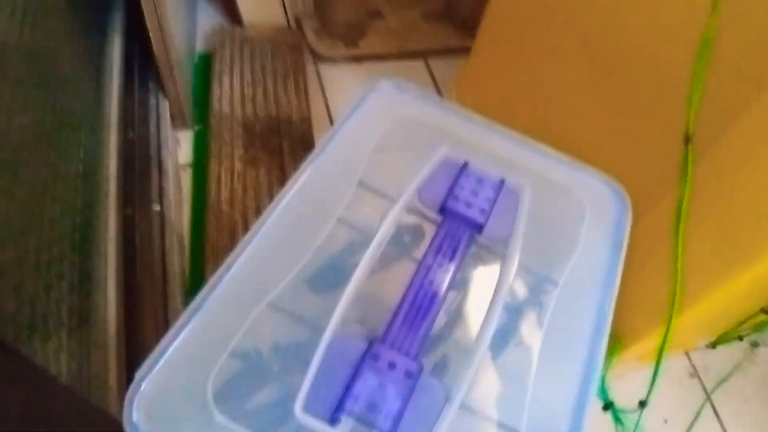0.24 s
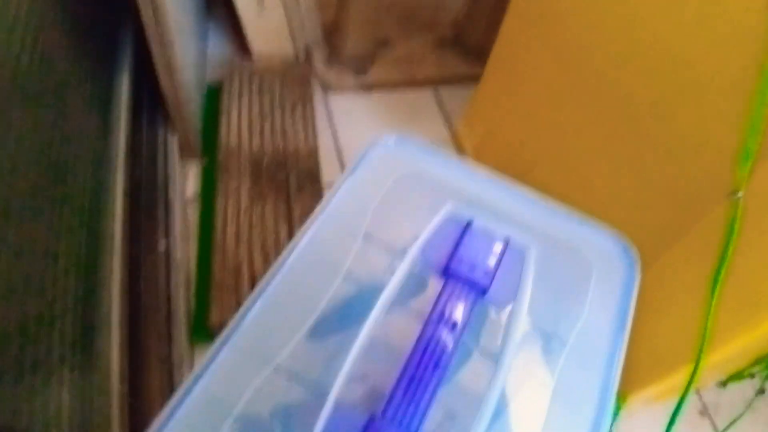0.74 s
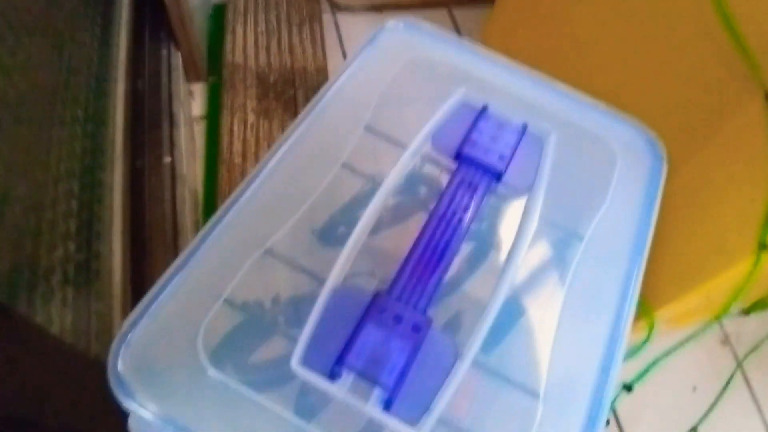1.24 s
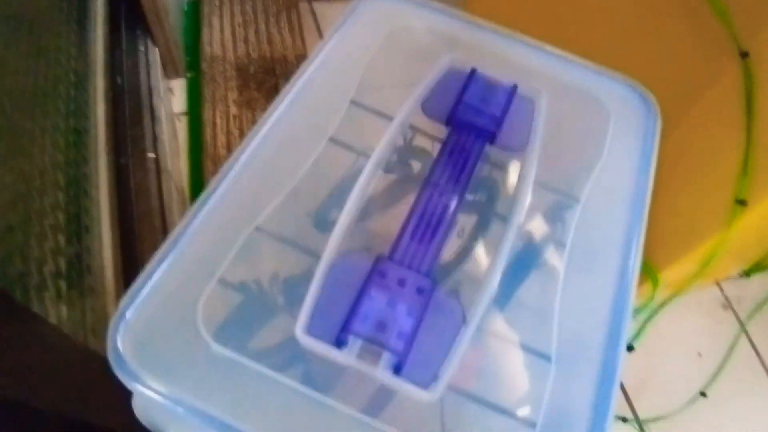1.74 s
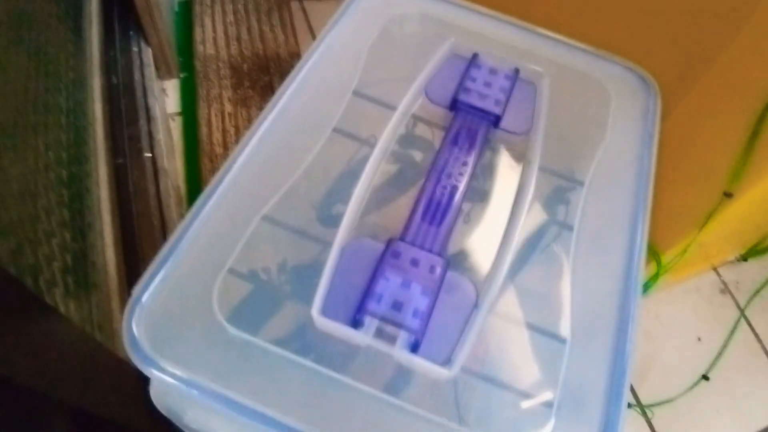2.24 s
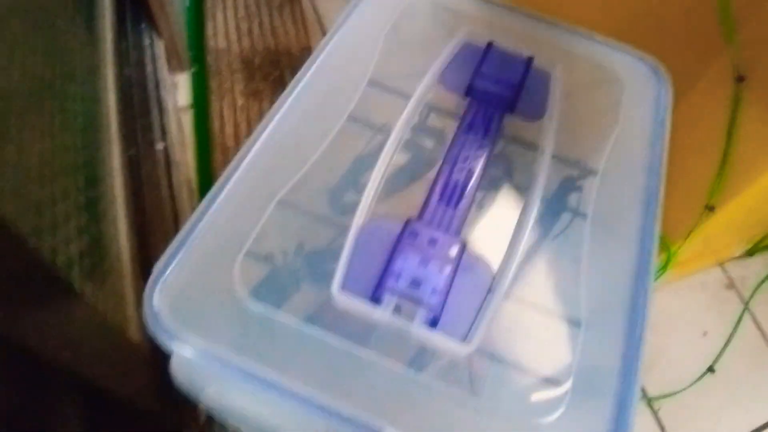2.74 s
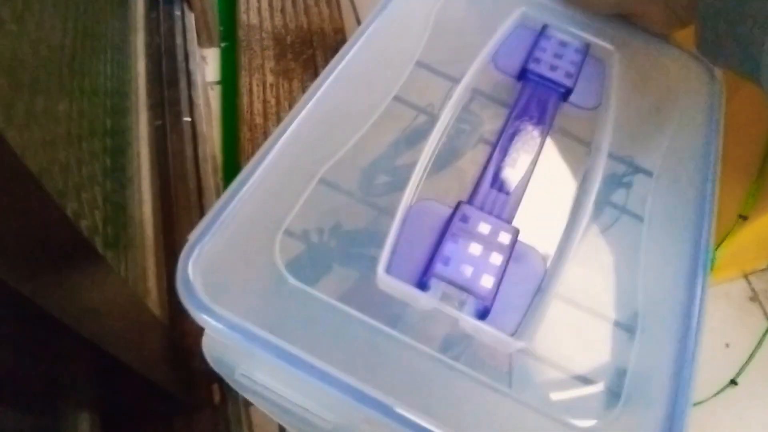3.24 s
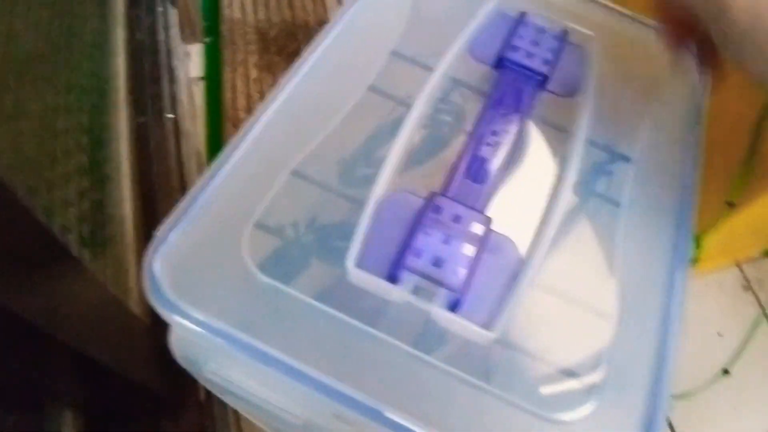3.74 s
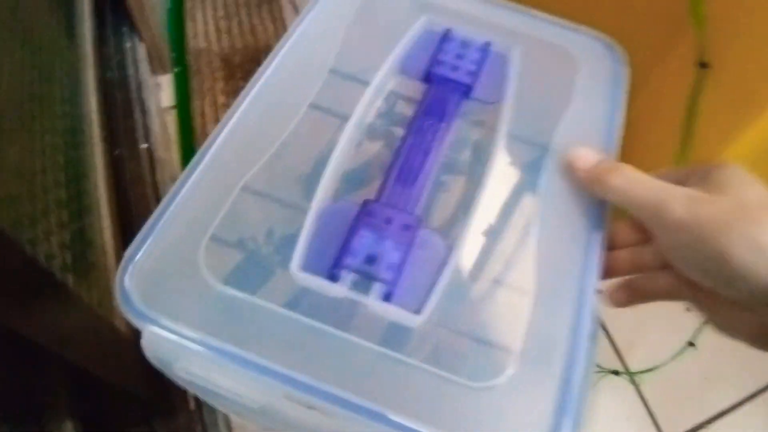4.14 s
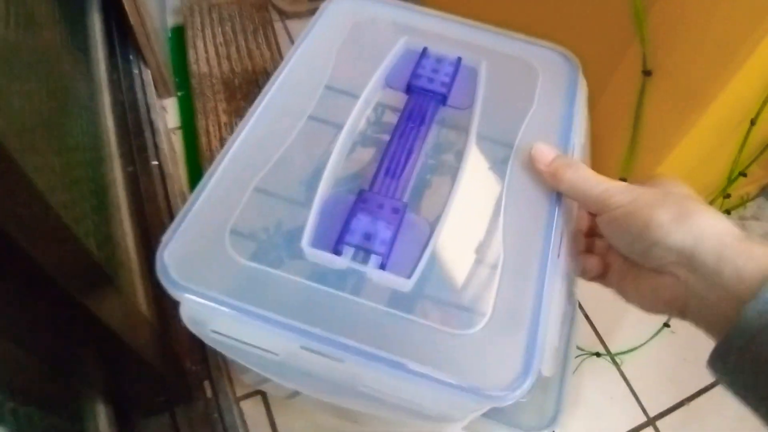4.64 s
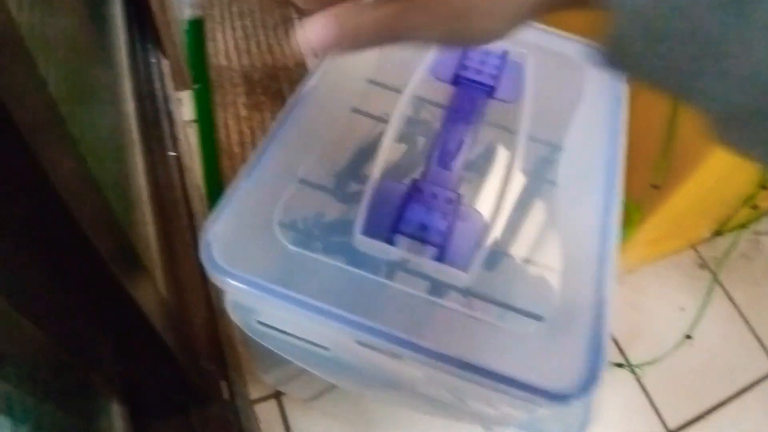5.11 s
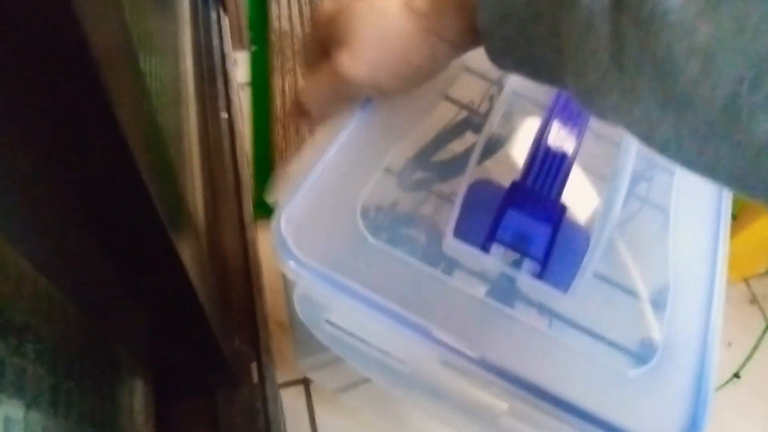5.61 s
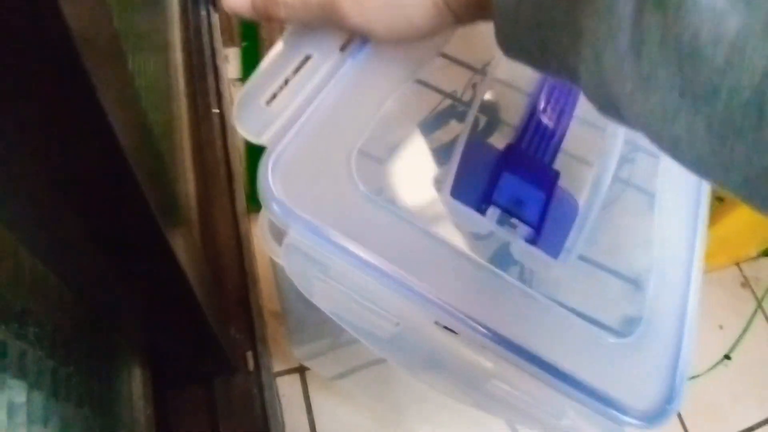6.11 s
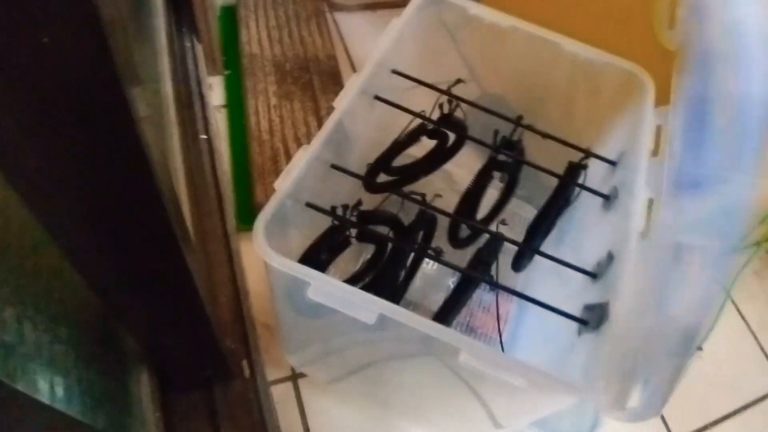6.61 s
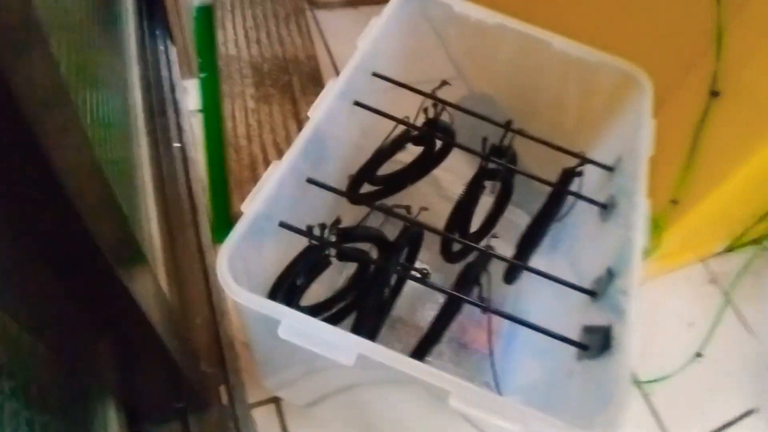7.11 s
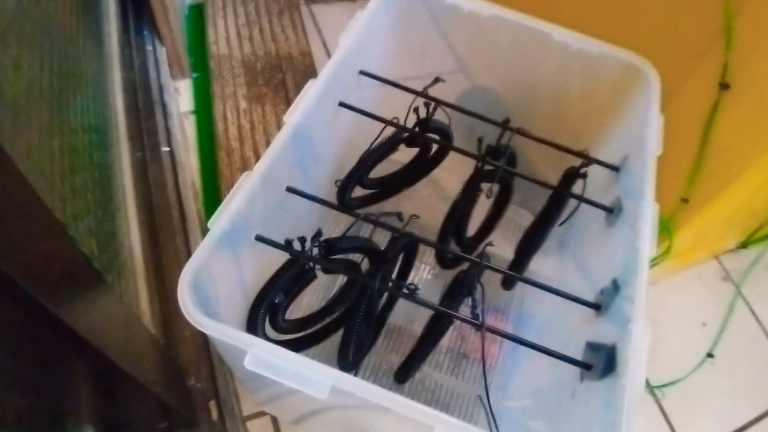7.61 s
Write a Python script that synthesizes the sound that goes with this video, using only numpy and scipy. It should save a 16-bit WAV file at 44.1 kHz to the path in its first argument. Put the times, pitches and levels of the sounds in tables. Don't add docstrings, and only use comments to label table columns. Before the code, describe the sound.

Close up in a small tiled room, a hollow plastic box is dragged in gritty scrapes with boomy bumps. After a quieter pause, fingers tap and rub the lid; a light latch click, then a hard snap, then the loudest crack. The lid comes free with soft pops and is put down with a brittle rattle. A faint machine drones far off.

```python
import sys
import numpy as np
from scipy import signal
from scipy.fft import rfft, irfft, next_fast_len
from scipy.io import wavfile
from scipy.ndimage import uniform_filter1d, map_coordinates

SR = 44100
rng = np.random.default_rng(int(sys.argv[2]) if len(sys.argv) > 2 else 0)


def boost_factor(decibels):
    exponent = np.asarray(decibels, float) / 20
    return 10 ** exponent


def digitize_waveform(pressure):
    field = np.atleast_2d(pressure).T
    bounded = np.clip(field, -1, 1)
    quanta = np.round(bounded * 32767).astype(np.int16)
    wavfile.write(sys.argv[1], SR, quanta)


N = 346626

# centre in Hz, width in Hz, level in dB.
HOLLOW_MODES = [(144.6, 9.5, 2.5), (207, 29, 2), (261.5, 20, 0), (312, 28, -7)]
SHELL_MODES = [(430, 40, 2), (599, 250, -3), (806, 82, -1.5), (1042, 313, -0.5), (1188, 405, -1),
               (1550, 206, -3.5), (2230, 920, -10)]
LID_MODES = [(145, 24, -1), (180, 15, -2), (213.7, 13, 0), (272, 8.5, 4), (353, 81, -4)]
# frequency in Hz, density in dB per Hz.
CRACK_SPECTRUM = [(1800, -73), (2600, 0.5), (4500, -2), (7000, -6.5), (10000, -9.5), (15000, -5.5)]


def rms(x):
    return np.sqrt(np.mean(np.abs(x) ** 2))


def unit(x):
    return x / np.sqrt(np.mean(x ** 2) + 1e-20)


def along(points, hz):
    f, v = np.transpose(points)
    return np.interp(np.log(hz + 1), np.log(f + 1), v)


def wobble(knots_per_s):
    knots = rng.standard_normal(int(N * knots_per_s / SR) + 4)
    return map_coordinates(knots, [np.arange(N) * knots_per_s / SR])


def filtered(x, response):
    size = next_fast_len(N + SR // 2)
    gain = response(np.fft.rfftfreq(size, 1 / SR))
    first = gain[0] if gain.ndim > 1 else gain
    return irfft(rfft(x, size) * gain / rms(first), size)[..., :N]


def modes(table):
    def response(f):
        total = 0
        for k, (centre_hz, width_hz, db) in enumerate(table):
            damping = 1j * f * width_hz
            total = total + (-1) ** k * boost_factor(db) * damping / (centre_hz ** 2 - f * f + damping)
        return total
    return response


def spectrum(points):
    return lambda f: boost_factor(along(points, f))


def stereo(pair):
    # frequency in Hz, correlation 0..1.
    likeness = [(100, 0.79), (250, 0.83), (500, 0.5), (1000, 0.12), (3000, 0.11), (8000, 0.19)]

    def mid_side(f):
        angle = np.arccos(np.clip(along(likeness, f), 0, .999)) / 2
        return np.array([np.cos(angle), np.sin(angle)])

    mid, side = filtered(pair, mid_side)
    return np.array([mid + side, mid - side])


def background():
    # time in s, room tone in dB, drone in dB.
    levels = [(0, -54.5, -57.5), (1.3, -64.5, -58.5), (2.5, -63, -58), (3.6, -62.5, -58.5),
              (4.2, -56.5, -57.5), (5, -59.5, -58), (6, -55, -57), (6.7, -55, -56.5), (7.2, -57.5, -57.5),
              (7.86, -66, -56)]
    # frequency in Hz, density in dB per Hz.
    air_spectrum = [(12, -35.5), (20, -13.5), (54, -2.5), (98, -12), (144, -4.5), (325, -15.5),
                    (401, -11.5), (474, -15), (818, -15), (1190, -24), (3000, -50.5), (3900, -90),
                    (6600, -120)]
    # centre in Hz, width in Hz, level in dB.
    drone_modes = [(33, 5.5, -9), (60.1, 6, 3.5), (128, 1.5, -0.5), (165, 16, -8.5), (430, 12, -19),
                   (665, 8.9, -25)]
    # frequency in Hz, density in dB per Hz.
    hiss_spectrum = [(1000, -12), (2000, 0), (4000, -1), (7000, -2), (9000, -5), (16000, -6)]
    t = np.arange(N) / SR
    s, air_db, drone_db = np.transpose(levels)
    air_gain = boost_factor(np.interp(t, s, air_db) + wobble(3))
    drone_gain = boost_factor(np.interp(t, s, drone_db))
    air = unit(stereo(filtered(rng.standard_normal((2, N)), spectrum(air_spectrum))))
    drone = unit(filtered(rng.standard_normal(N), modes(drone_modes)))
    hiss = filtered(rng.standard_normal((2, N)), spectrum(hiss_spectrum))
    return boost_factor(-1.0) * air_gain * air + drone_gain * drone + boost_factor(-76.5) * hiss


def strokes(rows, brightens=0):
    hold = 1.76
    edge_db = 25
    t = np.arange(0, N / SR, .001)
    gain = 0
    for s, db, rise_s, fall_s, *speed_db in rows:
        distance = np.maximum((s - t) / max(rise_s, .005), (t - s) / max(fall_s, .005))
        gain = gain + boost_factor(db + brightens * sum(speed_db) - edge_db * distance ** hold)
    return np.interp(np.arange(N) / SR, t, gain)


def driven(force, table):
    x = unit(filtered(force, lambda f: modes(table)(f) / (1 + (f / 450) ** 4)))
    power = np.abs(uniform_filter1d(x * x, size=1200))
    return unit(x / (power + 0.13) ** 0.088)


def patchy(x, depth_db):
    z = signal.stft(x, nperseg=256)[2]
    field = rng.standard_normal(z.shape[1:])
    field = uniform_filter1d(field, size=3, axis=0)
    field = uniform_filter1d(field, size=10, axis=1)
    return unit(signal.istft(z * boost_factor(depth_db * unit(field)), nperseg=256)[1][:, :N])


def drag():
    # peak in s, force in dB, rise in s, fall in s, speed in dB (faster is brighter).
    shoves = [(0.02, -59, .2, .15, -1), (0.11, -48.5, 0.066, 0.11, 0.5), (0.33, -44.5, 0.034, 0.084, -26),
              (1.04, -55.5, 0.028, 0.079, -6), (1.86, -50.5, 0.037, 0.16, -4), (2.05, -50, 0.094, 0.092, 4),
              (0.216, -36, 0.11, 0.15, -12.5), (0.44, -46.5, 0.075, 0.29, -6.5),
              (0.66, -59.5, 0.08, 0.25, 3.5), (0.874, -35, 0.057, 0.12, -11),
              (0.962, -49, 0.082, 0.18, -0.5), (1.96, -50.5, 0.077, 0.2, 1.5),
              (2.9, -43.5, 0.013, 0.16, -26.5), (3.045, -41, 0.017, 0.08, -26.5)]
    slides = [(2.14, -34.5, 0.27, 0.23, -33), (2.26, -38.5, 0.13, 0.18, -3), (2.53, -40, 0.038, 0.11, -4),
              (2.65, -50, 0.075, 0.18, -6.5)]
    rubs = [(1.18, -61.5, 0.054, 0.19, 16), (1.34, -64, 0.067, 0.077, 10), (1.65, -60, .03, 0.046, 11),
            (4.145, -49, .04, 0.047, 19.5), (3.41, -45.5, 0.014, 0.18, 11.5), (3.82, -47, 0.021, 0.41, 4.5),
            (4.104, -45, 0.037, 0.078, -2), (4.4, -52.5, 0.38, 0.25, 14), (4.818, -42.5, 0.027, 0.056, 19),
            (5.348, -49.5, 0.062, 1, 5.5), (5.56, -54, 0.95, 0.013, 8), (6.42, -61, 1, 0.25, 13),
            (6.55, -47, 0.039, 0.056, 15.5), (7.09, -44, 0.0157, 0.11, 7.5), (7.344, -47, 0.23, 0.092, -7)]
    # peak in s, level in dB, rise in s, fall in s.
    settling = [(5.88, -47, 0.3, 0.12)]
    nudges = [(6.25, -36, 0.043, 0.046), (6.375, -38, 0.036, 0.19), (6.51, -34, 0.0057, 0.034),
              (7.63, -40, 0.032, 0.042)]
    # centre in Hz, width in Hz, level in dB.
    base_modes = [(139.3, 3.4, 0)]
    wall_modes = [(197, 43, -1.5), (268.6, 22.7, -4), (317, 42, -7)]
    panel_modes = [(268.5, 14.4, 0)]
    # frequency in Hz, density in dB per Hz.
    hiss_spectrum = [(1100, -19), (1800, -17), (2400, -9), (3300, -0.5), (6800, -3), (9000, -7.5),
                     (15900, -4.5)]

    clumps = boost_factor(1.5 * wobble(45) + 2 * wobble(140))
    grains = boost_factor(2.5 * rng.exponential(size=(3, 1, N)))
    grit = rng.standard_normal((3, 2, N)) * grains * clumps

    shove, slide = strokes(shoves), strokes(slides)
    boom = (boost_factor(-3.0) * shove + slide) * driven(grit[0, 0], base_modes)
    boom += (boost_factor(2.0) * shove + boost_factor(-10.5) * slide) * driven(grit[0, 0], wall_modes)
    boom += boost_factor(-1.5) * (strokes(rubs) + strokes(settling)) * driven(grit[0, 1], LID_MODES)
    boom += strokes(nudges) * driven(grit[1, 1], panel_modes)

    scrape_gain = boost_factor(-6.0) * strokes(shoves, brightens=0.47)
    scrape_gain += boost_factor(-12.5) * strokes(slides, brightens=0.51)
    scrape_gain += boost_factor(-23) * strokes(rubs, brightens=0.85)
    hiss_gain = boost_factor(-8.5) * strokes(shoves, brightens=0.74)
    hiss_gain += boost_factor(-15.5) * strokes(slides, brightens=0.34)
    hiss_gain += boost_factor(-17.5) * strokes(rubs, brightens=0.34)
    scrape = scrape_gain * patchy(filtered(grit[1], modes(SHELL_MODES)), depth_db=2.5)
    hiss = hiss_gain * patchy(filtered(grit[2], spectrum(hiss_spectrum)), depth_db=2)
    return boost_factor(-3.5) * boom + stereo(scrape + hiss)


def alike(rows, **shared):
    full = []
    for s, db, *rest in rows:
        own = iter(rest)
        traits = [shared[k] if k in shared else next(own) for k in ("boom_db", "crack_db", "spot_hz", "t60")]
        full.append((s, db, *traits))
    return full


def contacts(rows, low, body, top, boom_db, body_db, ring_db, top_db, blow_db, rise):
    # time in s, left-right level in dB, left microphone delay in ms.
    places = [(0, -1, 0.081), (1, -1.5, 0.26), (3, 0.5, 0.15), (3.5, -0.5, -0.16), (4.598, -1, -0.091),
              (5.3, 1.5, 0.016), (5.648, -3, 0), (6.401, -4.5, 0.1), (6.731, 4, 0.12), (7.081, -5.5, 0.49),
              (7.299, -8, 0.43), (7.6, -7, 0.052)]
    size, lead = 2 ** 14, 400
    linger, tail_db = 4, -18
    out = np.zeros((2, N + size))
    f = np.fft.rfftfreq(size, 1 / SR)
    t = np.maximum(np.arange(size) - lead, 0) / SR
    thick = 1 / (1 + 1j * f / 3000) ** 2
    low, body, top = modes(low)(f), modes(body)(f), top(f)
    hollow = boost_factor(boom_db) * low / rms(low)
    shell = boost_factor(body_db) * body / rms(body)
    crackle = boost_factor(top_db) * top / rms(top)
    ends = np.clip((size - np.arange(size)) / 4000 - .2, 0, 1)
    opposite = np.array([[1], [-1]])
    place_s, place_db, place_ms = np.transpose(places)
    for s, db, boom, crack, spot_hz, t60 in rows:
        t60 = max(t60, .002)
        spot_hz = spot_hz * np.exp(rng.normal(0, .05))
        decay = boost_factor(-60 * t / t60) + boost_factor(tail_db - 60 * t / (linger * t60))
        burst, other = rng.standard_normal((2, size)) * decay * (1 - np.exp(-t / rise))
        burst += boost_factor(blow_db) * t / rise * np.exp(1 - t / rise)
        both, apart = rfft([burst, other])
        spot = modes([(spot_hz, spot_hz / 5, 0)])(f)
        struck = shell + boost_factor(ring_db) * spot / rms(spot)
        near = (both + 0.6 * opposite * f / (f + 400) * apart) * thick * struck
        dull = 1 / (1 + (f / (14000 * boost_factor(0.37 * crack))) ** 2)
        snap = boost_factor(crack) * crackle * dull * (both + .5 * opposite * apart)
        push = boost_factor(boom) * hollow * rfft(np.abs(burst))
        pan_db = np.interp(s, place_s, place_db)
        lag_s = np.interp(s, place_s, place_ms) / 1000
        ears = boost_factor(opposite * pan_db / 2) * np.exp(-1j * np.pi * f * lag_s * opposite)
        sound = irfft(push + ears * (near + snap), size)
        out[:, round(s * SR) - lead:][:, :size] += boost_factor(db) * ends * sound
    return out[:, :N]


def bumps():
    # start in s, peak in dB, boom in dB, crack in dB, burst t60 in s.
    blows = [(0.081, -51.5, 15.5, 1, 0.097), (0.154, -41.5, -18, 2, 0.19), (0.187, -34, 14.5, -10, 0.019),
             (0.25, -29.5, -16, -8.5, 0.022), (0.474, -37, 3, -5, 0.056), (0.689, -52, 8, -9, 0.059),
             (0.846, -26, 2, -11.5, 0.048), (0.956, -28.5, 0.5, -12.5, 0.025),
             (0.979, -24, -18, -20, 0.0096), (1.024, -33, -4, -4.5, 0.024), (1.939, -34, 0, -26, 0.061),
             (2.217, -40, 5, 5.5, 0.026), (2.2835, -27, -12.5, -5.5, 0.02), (2.327, -48.5, -9, 7.5, 0.022),
             (2.883, -46, 10, -10.5, 0.042), (3.02, -47, 16, -17.5, 0.028)]
    return contacts(alike(blows, spot_hz=510), HOLLOW_MODES, SHELL_MODES, spectrum(CRACK_SPECTRUM),
                    boom_db=-1.5, body_db=0.5, ring_db=-5.5, top_db=4.0, blow_db=-19.0, rise=0.00096)


def ticks():
    # start in s, peak in dB, boom in dB, crack in dB, burst t60 in s.
    catches = [(0.138, -55, -5, 0, .02), (0.206, -41, 6, 6.5, .04), (0.408, -62, -20, 4, .01),
               (0.424, -45.5, 5, -14, 0.045), (0.527, -50, -5, -15, 0.032), (0.818, -59.5, -6, 9, 0.023),
               (0.861, -35.5, 10, -20, 0.019), (1.624, -65, -13, 1, .05), (1.835, -56.5, 10.5, -15, 0.066),
               (1.881, -44.5, -5, -8, 0.056), (2.038, -50, 4, 2, .04), (2.511, -53, 8, 0, 0.031),
               (2.606, -58, -3, -10, 0.06), (3.057, -51, -3, -11, 0.033), (3.822, -40.5, -11, -7.5, 0.045),
               (4.764, -58.5, -10, 1, .03), (4.465, -48.5, -20, -25, .05), (6.217, -49.5, 10.5, -25, 0.026),
               (2.522, -47.5, 11.5, -20, 0.057), (2.27, -48, -10, -5, .015), (7.287, -44, 5, -25, .015),
               (6.444, -42, 10, -25, .02), (2.725, -54, 12, -25, .05), (5.1, -54, -10, -25, .15),
               (5.436, -46, -10, -2, 0.059)]
    return contacts(alike(catches, spot_hz=1100), HOLLOW_MODES, SHELL_MODES, spectrum(CRACK_SPECTRUM),
                    boom_db=-2.0, body_db=1.8, ring_db=-10.5, top_db=3, blow_db=-10.5, rise=0.00044)


def thuds():
    # start in s, peak in dB.
    heavy_blows = [(1.99, -66), (2.893, -31), (3.03, -39), (5.331, -36), (5.628, -34.5), (7.093, -33.5)]
    out = np.zeros(N + SR)
    t = np.arange(SR // 5) / SR
    swing = (1 - np.exp(-t / 0.0085)) * np.sin(2 * np.pi * 86 * t)
    for s, db in heavy_blows:
        out[round(s * SR):][:len(t)] += boost_factor(db - 60 * t / 0.11) * swing
    return out[:N]


def taps():
    # start in s, peak in dB, boom in dB, crack in dB, burst t60 in s.
    fingers = [(3.503, -38.5, 4.5, -15.5, 0.017), (3.786, -29, -4, -34, 0.027),
               (3.816, -25, -9, -50, 0.048), (3.867, -43, -29, -19, 0.019), (4.083, -33, -47, -20, 0.013),
               (4.091, -28.5, -29, -38, 0.046), (4.161, -37.5, -20, -25, 0.023),
               (4.344, -38.5, -8, -20, 0.049), (4.362, -30, -25, -14, 0.055),
               (4.378, -32.5, -9, -14.5, 0.058), (4.642, -30.5, -1, -32, 0.0099),
               (4.808, -35.5, -10, -18, 0.064), (5.519, -27.5, -12, -18, 0.0078),
               (6.242, -38.5, 1.5, -30, 0.06), (6.353, -48, -15, -26, 0.039), (7.0735, -33, 8, -8, 0.015),
               (7.083, -27, -5, -17.5, 0.076), (7.299, -33, -36, -33, 0.015),
               (7.3385, -27, -41, -30, 0.015), (7.612, -42.5, -6, -19, 0.12)]
    # start in s, peak in dB, boom in dB, crack in dB.
    rim_catches = [(3.139, -31, -4.5, -14.5), (3.225, -34.5, 3, -38), (3.833, -30.5, -15, -20.5),
                   (4.683, -40.5, -6, -15), (5.313, -43, -9.5, -20), (5.425, -37, -3, -27.5),
                   (5.466, -27, -10, -17), (6.526, -43.5, -3, -11.5), (7.093, -40, -47, -22)]
    # start in s, peak in dB, crack in dB.
    flicks = [(3.397, -32.5, -12.5), (3.479, -41.5, -13)]
    rows = alike(fingers, spot_hz=605)
    rows += alike(rim_catches, spot_hz=900, t60=0.054)
    rows += alike(flicks, boom_db=-16, spot_hz=1980, t60=0.032)
    return contacts(rows, LID_MODES, SHELL_MODES, spectrum(CRACK_SPECTRUM),
                    boom_db=-7.5, body_db=-8.0, ring_db=-6, top_db=11.5, blow_db=1.0, rise=0.00014)


def latches():
    # start in s, peak in dB, crack in dB, struck spot in Hz, burst t60 in s.
    far_blows = [(3.266, -45, -8, 830, 0.054), (3.275, -27.5, 2, 697, 0.027), (3.28, -24, -0.5, 309, 0.046),
                 (3.299, -34, -37, 350, 0.041)]
    right_blows = [(4.556, -31.5, -13.5, 637, 0.13), (4.5652, -9, -13.5, 520, 0.071),
                   (4.572, -21, 1, 650, 0.023), (4.582, -18, -5, 510, 0.034),
                   (4.596, -17, -14.5, 402, 0.039)]
    left_blows = [(5.615, -36.5, -12, 705, 0.069), (5.622, -10, -28, 500, 0.038),
                  (5.626, -2.5, -6, 720, 0.0044), (5.632, -7.5, -11.5, 430, 0.063),
                  (5.643, -15, -5, 960, 0.011), (5.654, -7.5, -5.5, 430, 0.0077),
                  (5.666, -30, 1.5, 1100, 0.014), (5.677, -16, -4.5, 1140, 0.025)]
    # centre in Hz, width in Hz, level in dB.
    far_modes = [(250.5, 30, 20), (430, 60, 8), (560, 90, 8), (1000, 200, 2)]
    right_modes = [(383, 420, 17), (525, 45, 6.5), (990, 65, 12), (1540, 5.9, 7), (1450, 62, 2.5),
                   (2180, 33, 5.5)]
    left_modes = [(249.6, 22, -1), (428, 21, 5), (794, 70, 4), (961, 40, -3), (1160, 110, -2),
                  (2314, 106, -10.5)]
    # frequency in Hz, density in dB per Hz.
    far_crack = [(1290, -32), (2200, -1.5), (2870, -1.5), (5300, -16), (6370, -10), (7580, -23.5),
                 (16000, -22)]
    right_crack = [(1290, -41), (2200, -8.5), (3680, -5), (4130, -5.5), (4530, -7), (5170, -6.5),
                   (7030, -11.5), (7710, -29.5), (8950, -21), (16000, -27.5)]
    left_crack = [(1200, -35), (2100, -8), (2900, -3), (3250, -6), (3650, -2), (4100, -7), (5000, -13),
                  (6200, -5), (7500, -18), (11500, -19), (16000, -27)]
    far = contacts(alike(far_blows, boom_db=1.0), HOLLOW_MODES, far_modes, spectrum(far_crack),
                   boom_db=-10.5, body_db=6.0, ring_db=6, top_db=-3, blow_db=-4.5, rise=0.00076)
    right = contacts(alike(right_blows, boom_db=-17.5), LID_MODES, right_modes, spectrum(right_crack),
                     boom_db=-17.5, body_db=-7.0, ring_db=-20.5, top_db=3, blow_db=-0.5, rise=0.00016)
    left = contacts(alike(left_blows, boom_db=-11), HOLLOW_MODES, left_modes, spectrum(left_crack),
                    boom_db=-4.5, body_db=-7.0, ring_db=-4.5, top_db=-3.5, blow_db=-11.0, rise=0.00054)
    return far + right + left


def buzz():
    # peak in s, level in dB, rise in s, fall in s.
    shivers = [
        (4.612, -42, .03, 0.044),
        (5.668, -30.5, 0.039, 0.035),
        (4.13, -57, .05, .04),
        (3.9, -64, .05, .06),
        (6.435, -47, .015, .05),
    ]
    # centre in Hz, width in Hz, level in dB.
    flap_modes = [(3650, 420, 0)]
    ring = filtered(rng.standard_normal((2, N)), lambda f: modes(flap_modes)(f) ** 2)
    return strokes(shivers) * unit(ring)


def lift():
    # start in s, peak in dB, crack in dB, burst t60 in s.
    releases = [(6.4105, -20, -27, 0.046), (6.4245, -15, -22, .045), (6.45, -32, -26, .06),
                (6.7245, -18, -20.5, .025)]
    # centre in Hz, width in Hz, level in dB.
    rim_modes = [(760, 200, -3), (960, 150, 1.5), (1100, 150, -1), (1820, 950, -9)]
    # frequency in Hz, density in dB per Hz.
    rim_crack = [(1800, -41), (2600, -10), (3700, 2), (4800, -9), (6000, -5), (8000, -15), (15000, -11)]
    return contacts(alike(releases, boom_db=-23.0, spot_hz=982), LID_MODES, rim_modes, spectrum(rim_crack),
                    boom_db=-4.5, body_db=-10, ring_db=-5, top_db=11, blow_db=-12, rise=0.0015)


def rattle():
    # start in s, peak in dB, crack in dB, ring in Hz.
    clatters = [(7.138, -21.5, 0, 2150), (7.193, -36, -18, 2300), (7.203, -26, -5.5, 1950),
                (7.235, -23.5, -4.5, 2400), (7.247, -24.5, -5, 1950), (7.255, -24.5, -16, 2100),
                (7.266, -23.5, -5, 2150)]
    # centre in Hz, width in Hz, level in dB.
    flap_modes = [(650, 1200, -6), (1340, 110, 2), (2040, 600, -6), (2480, 300, -16)]
    rows = alike(clatters, boom_db=-34, t60=0.01)
    return contacts(rows, LID_MODES, flap_modes, spectrum(CRACK_SPECTRUM),
                    boom_db=-21, body_db=-10.0, ring_db=-4.5, top_db=1.0, blow_db=-18.0, rise=0.0002)


def room(x):
    # frequency in Hz, t60 in s.
    decay_times = [(100, 0.42), (500, 0.25), (2000, 0.29), (6000, 0.21), (14000, 0.34)]
    out, step = np.zeros((2, N + 2 * SR)), SR // 3
    for at in range(0, N, step):
        hz, t, z = signal.stft(rng.standard_normal((2, SR // 2)), SR, nperseg=256)
        decay = boost_factor(-60 * t / along(decay_times, hz)[:, None])
        tail = signal.istft(z * decay, SR, nperseg=256)[1]
        wet = signal.fftconvolve(x[None, at:at + step], tail / np.linalg.norm(tail[0]), axes=1)
        out[:, at + 200:at + 200 + wet.shape[1]] += wet
    return stereo(out[:, :N])


def scene():
    box = drag() + bumps() + ticks() + thuds() + taps() + latches() + lift() + rattle()
    return box + boost_factor(-10.0) * room(box.mean(0)) + buzz() + background()


def roll_off(x):
    return signal.sosfilt(signal.butter(12, 16990, fs=SR, output="sos"), x)


def record(dry):
    low_pass = signal.butter(24, 15800, fs=SR, output="sos")
    return roll_off(signal.sosfiltfilt(low_pass, dry))


dry = scene()
out = record(dry)
digitize_waveform(out)
```